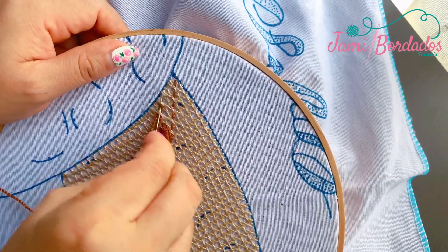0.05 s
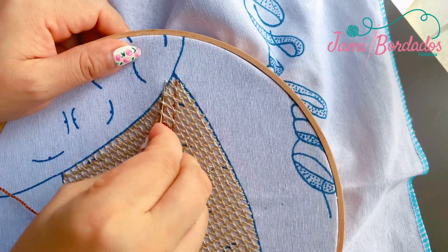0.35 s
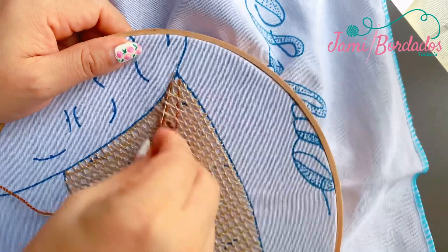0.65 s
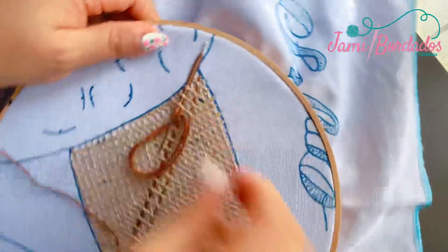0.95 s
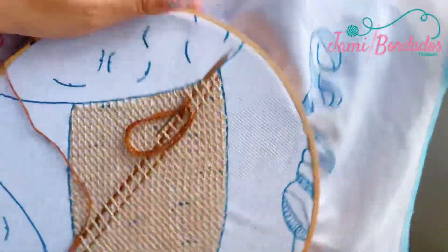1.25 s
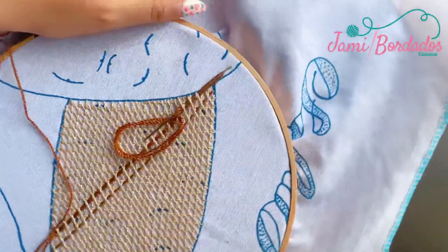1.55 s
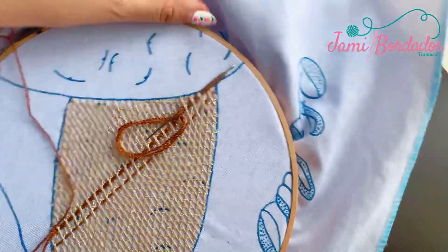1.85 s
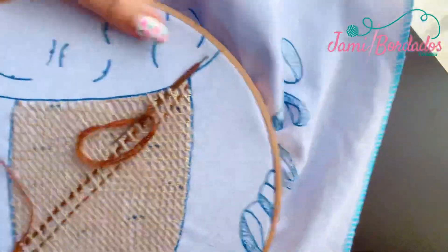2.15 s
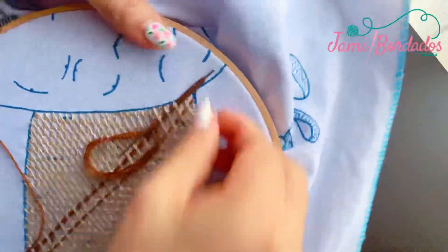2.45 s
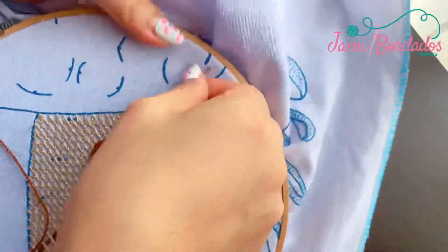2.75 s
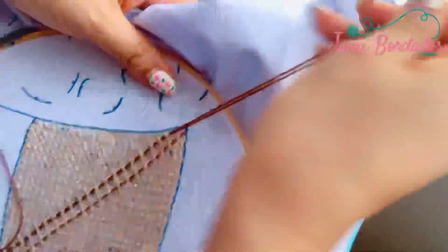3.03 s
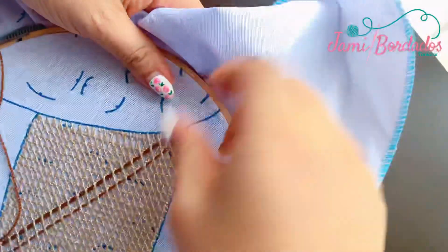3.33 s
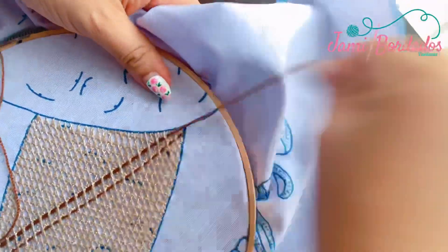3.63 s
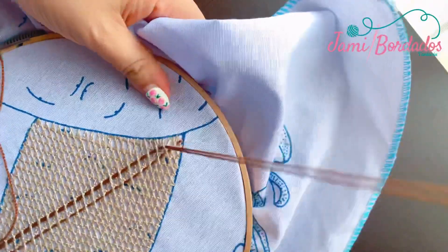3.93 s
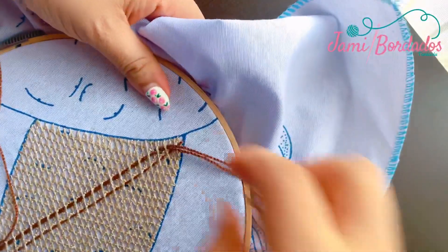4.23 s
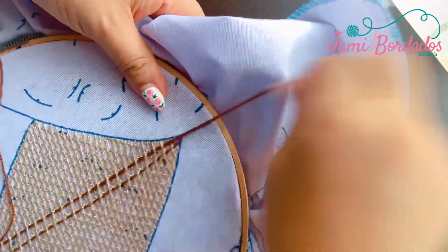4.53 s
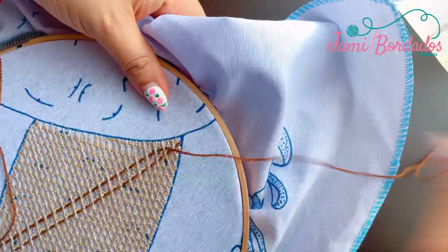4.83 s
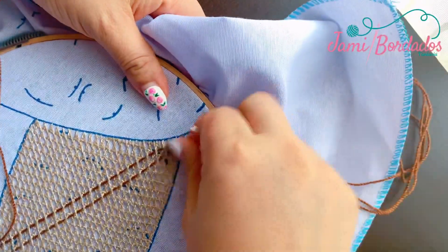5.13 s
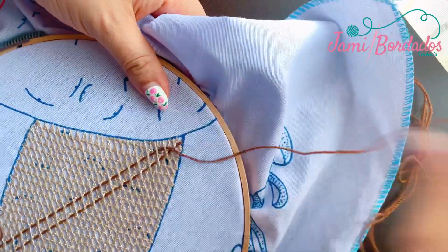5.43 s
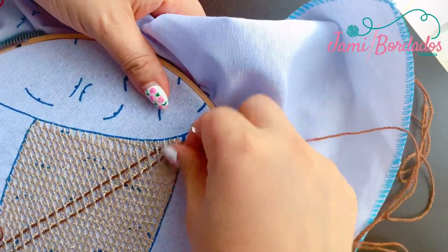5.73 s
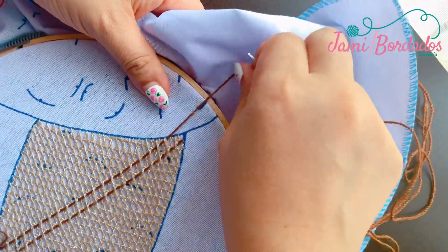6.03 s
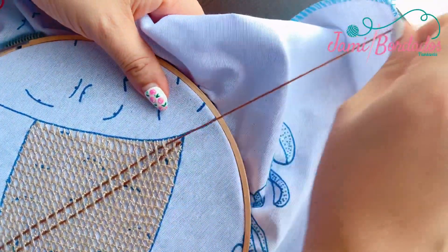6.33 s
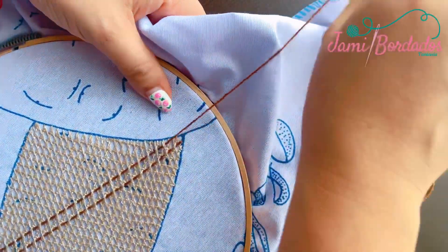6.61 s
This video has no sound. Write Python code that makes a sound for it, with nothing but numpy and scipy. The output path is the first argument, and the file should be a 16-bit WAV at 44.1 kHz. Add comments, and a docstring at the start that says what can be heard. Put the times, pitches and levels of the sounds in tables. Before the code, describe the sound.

Hand embroidery is heard close to the microphone in a quiet room. For the first 2.8 seconds, cotton cloth rustles and rubs as a wooden hoop is shifted, with soft bumps, a sharp tick at about 1.1 seconds and a cluster of small needle and fingernail scrapes around 1.7 to 2.2 seconds. From 2.8 seconds, thread is drawn through the taut fabric in two short, hissing tugs. A longer, rasping pull starts at 3.5 seconds, makes the cloth ring like a slack drum and snaps tight at 3.8 seconds with a dry knock, the loudest sound. Softer pulls follow at about 4.4, 5.1, 5.7 and 6.1 seconds, among light ticks and rustles, until the end near 6.7 seconds. Throughout, a motor drones faintly far outside over low room noise, speeding up and rising in pitch from about 4 seconds.

```python
"""Hand embroidery close to the microphone, in a quiet room with a motor droning faintly far outside.
First, fingers shift a wooden hoop: its cotton cloth rustles, nail and needle scrape and tick on it,
and the hand bumps the frame. From 2.8 s, thread is drawn through the tight cloth in several pulls;
it hisses, rasps and makes the cloth ring like a drum. At 3.8 s it snaps tight with a loud knock.
Softer pulls follow, while the far motor runs faster."""
import sys
import numpy as np
from scipy import signal
from scipy.fft import rfft, irfft, next_fast_len
from scipy.io import wavfile

SR = 44100
rng = np.random.default_rng(int(sys.argv[2]) if len(sys.argv) > 2 else 0)


def waveform_to_disk(signal):
    """Save audio, clipped to [-1, 1], as 16-bit WAV at the path in sys.argv[1]."""
    frames = np.transpose(np.atleast_2d(signal))
    scaled = np.clip(frames, -1, 1) * 32767
    samples = np.round(scaled).astype(np.int16)
    wavfile.write(sys.argv[1], SR, samples)


N = 294147
TIME = np.arange(N) / SR
PADDED = next_fast_len(N + SR // 2, True)  # leaves space for echoes to die away
FREQS = np.maximum(np.fft.rfftfreq(PADDED, 1 / SR), 1)


def from_db(db):
    """Turn decibels into a gain to multiply by."""
    return np.exp(np.asarray(db) * np.log(10) / 20)


def unit_power(x):
    """Scale a sound so that its average power is 1."""
    return x / np.sqrt(np.mean(x ** 2) + 1e-20)


def curve(points):
    """Join (frequency, value) points into a curve over all frequencies."""
    hz, value = np.transpose(points)
    return np.interp(np.log(FREQS), np.log(hz), value)


def shaped(x, response):
    """Filter a sound by giving each frequency its own gain."""
    return irfft(rfft(x, PADDED) * response, PADDED)[..., :N]


def band(x, low_hz, high_hz, order=2):
    """Keep what lies between two frequencies."""
    sos = signal.butter(order, [low_hz, min(high_hz, SR / 2 - 1)], "band", fs=SR, output="sos")
    return signal.sosfilt(sos, x + 1e-18)


def unit_in_band(x, low_hz, high_hz):
    """Scale a sound so that its power between two frequencies is 1."""
    return x / np.std(band(x, low_hz, high_hz))


def drift(rate_hz):
    """A smooth random wander, about 1 in size; a higher rate wanders faster."""
    step, settle = 20, 2000
    pole = np.exp(-2 * np.pi * step * rate_hz / SR)
    noise = rng.standard_normal(N // step + settle + 2)
    slow = signal.lfilter([1], [1, -2 * pole, pole * pole], noise)[settle:]
    return np.interp(np.arange(N) / step, np.arange(len(slow)), unit_power(slow))


def strokes(rows, attack_s, release_s, attack_share=0):
    """Loudness of hand strokes over time: each eases in, swells or fades, then dies away."""
    power = np.zeros(N)
    for start_s, length_s, level_db, swell_db in rows:
        at = int(start_s * SR)
        age = TIME[:min(N - at, int((length_s + 10 * release_s) * SR))]
        rise = np.sin(np.pi / 2 * np.minimum(age / (attack_s + attack_share * length_s), 1)) ** 2
        hold = from_db(level_db + swell_db * (np.minimum(age / length_s, 1) - .5))
        fall = np.exp(-np.maximum(age - length_s, 0) / release_s)
        power[at:at + len(age)] += (rise * hold * fall) ** 2
    return np.sqrt(power)


def room(level_db=-52.5, hum_hz=245.6, hum_db=-65, pan_db=-2.0):
    """The room's air: a dull, steady noise, nearly alike left and right in the bass, and a faint hum."""
    # Tone of the background noise: frequency_hz, level_db
    air_tone = [(20, -31), (42, -2.5), (70, 0), (115, -7), (160, -5.5), (210, -15), (260, -16.5),
                (340, -31), (450, -40.5), (650, -40.5), (880, -42.5), (980, -26), (1100, -47.5),
                (1500, -38), (1700, -40), (1950, -44.5), (2300, -42.5), (2900, -43), (4200, -53),
                (7000, -49), (11000, -51), (16000, -56.5)]
    # Strength of the part that is opposite left and right: frequency_hz, gain_db
    side_tone = [(35, -26), (100, -15), (250, -2.5), (500, 14.5), (4000, 0.5), (16000, -2.5)]
    middle, side = unit_power(shaped(rng.standard_normal((2, N)), from_db(curve(air_tone))))
    middle = middle * from_db([[pan_db / 2], [-pan_db / 2]])
    side = shaped(side, from_db(curve(side_tone))) * np.array([[1], [-1]])
    hum = from_db(hum_db) * unit_power(np.sin(2 * np.pi * hum_hz * TIME))
    return hum + from_db(level_db) * (middle + side)


def motor(waver_db=1.97, jitter=0.0029, top_roar_db=-66.5, roar_db_per_octave=28, pan_db=-2.0):
    """A far motor slows, then speeds up; only its lowest tones and a dull roar pass the walls."""
    # How the motor runs: time_s, firing_rate_hz, drone_db
    run = [(0, 54.4, -67), (.5, 54.27, -51), (1.0, 54.25, -46.5), (1.5, 52.45, -46), (2.0, 53.1, -50),
           (2.8, 50.43, -44), (3.3, 47.9, -56.5), (3.7, 52.07, -56), (3.95, 71, -47), (4.15, 73.2, -42),
           (4.35, 74.1, -49.5), (4.75, 78.76, -43.5), (5.1, 81.55, -43.5), (5.4, 82.74, -45.5),
           (5.75, 82.35, -47.5), (6.17, 80.66, -39), (6.67, 78.75, -51.5)]
    # Tones in its drone: multiple_of_firing_rate, level_db
    tones = [(1, 1), (1.5, -14.5), (2, -10.5), (2.5, -14), (3, -21.5), (3.5, -21)]
    # Tone of its roar: frequency_hz, level_db
    roar_tone = [(80, -20.5), (200, -4.5), (300, -1.5), (350, 2), (420, -15), (540, -18.5), (650, -10.5),
                 (780, -16.5), (1200, -22), (1650, -14.5), (2500, -27), (5000, -44.5)]
    time_s, *columns = np.transpose(run)
    firing_hz, drone_db = [np.interp(TIME, time_s, column) for column in columns]
    phase = 2 * np.pi * np.cumsum(firing_hz * (1 + jitter * drift(9.6))) / SR
    drone = sum(from_db(db + waver_db * drift(2.9)) * np.sin(multiple * phase + 2 * np.pi * rng.random())
                for multiple, db in tones)
    roar = unit_power(shaped(rng.standard_normal(N), from_db(curve(roar_tone))))
    roar *= from_db(top_roar_db + roar_db_per_octave * np.log2(firing_hz / firing_hz.max()))
    return (from_db(drone_db) * unit_power(drone) + roar) * from_db([[pan_db / 2], [-pan_db / 2]])


def slips(per_s, spread_db, clump_db, clump_hz):
    """Fibres catch and let go: random clicks of uneven size, in louder and softer clumps."""
    chance, size, sign = rng.random((3, N))
    clicks, at = np.zeros(N), chance < per_s / SR
    clicks[at] = from_db(spread_db * np.minimum(-np.log(1 - size[at]), 4)) * np.sign(sign[at] - .5)
    return clicks * from_db(clump_db * drift(clump_hz))


def spread_out(x):
    """Rubbing covers a patch of cloth, so left and right each hear some noise of their own."""
    # What one side hears alone, compared with what both share: frequency_hz, level_db
    one_side = [(300, -12), (700, -5), (1500, -12), (2500, -1), (4000, -2), (5200, -11), (16000, -9)]
    own = from_db(curve(one_side))
    shared = 1 / np.sqrt(1 + own ** 2)
    return shaped(unit_power(x), shared) + shaped(rng.standard_normal((2, N)), own * shared)


def hoop(force):
    """The cloth stretched in its hoop rings like a slack drum when it is pushed."""
    # Its ringing tones: pitch_hz, level_db, ring_s (time to fade by 60 dB)
    tones = [(90, -7, 0.26), (122.4, 1.5, 0.086), (174, 0, 0.1), (215, -7, .1), (271, 6.5, .24),
             (339, -5, 0.19), (399, -12.5, 0.06), (445, -12, .14), (640, -9, .1), (790, -8.5, 0.1),
             (859.8, -13.5, .1), (960, -2.5, 0.1), (1045, -7, 0.09), (1195, -15.5, 0.11), (1545, -11, .08),
             (1970, -9, 0.07), (2067, -13, .08), (2309, -2.5, 0.08)]
    age = TIME[:SR // 4]
    ring = sum(from_db(db - 60 * age / ring_s) * np.cos(2 * np.pi * hz * age)
               for hz, db, ring_s in tones)
    return signal.oaconvolve(force, ring / np.linalg.norm(ring))[:N]


def cloth(attack_s=0.027, release_s=0.017, flutter_db=0.98, grip_db=1.53, ring_db=-25.0):
    """Folds swish over each other; fingertips rub the stretched weave and make it ring."""
    # The hand shifts the cloth; long moves are light, steady contact under the short ones:
    # start_s, length_s, swish_db, rub_db, swell_db (change from start to end)
    moves = [ (0.14, 0.057, -97, -63, 5), (0.181, 0.077, -64.5, -67, 4), (0.443, 0.33, -74, -67, -17),
             (0.756, 2, -64.5, -64, 2), (1.201, 0.4, -83, -67, 8), (3.105, 0.19, -64.5, -70.5, -1),
             (0.399, 0.087, -59.5, -61.5, 8), (0.545, 0.083, -67, -70, 10), (0.683, 0.072, -51.5, -56, 10),
             (0.754, 0.33, -52, -64.5, 1.5), (0.866, 0.5, -56.5, -62.5, 12), (1.119, 0.072, -75, -74, -6),
             (1.378, 0.13, -64, -83, -10), (1.655, 0.16, -52.5, -54.5, 6.5), (1.828, 0.083, -56.5, -53, -9),
             (2.009, 0.12, -51.5, -58, 3), (2.113, 0.093, -55.5, -68, 11.5), (2.276, 0.019, -53, -64, 7),
             (2.417, 0.15, -61.5, -74, -10), (2.544, 0.038, -60, -58, 4), (2.702, 0.064, -60, -55, 11),
             (2.749, 0.085, -49.5, -56, 14.5), (2.875, 0.19, -58, -58.5, -15),
             (3.127, 0.038, -59.5, -84, 9), (3.342, 0.059, -56, -57, 1.5),
             (3.417, 0.046, -55.5, -57.5, 2.5), (3.924, 0.088, -66.5, -70, -16),
             (4.277, 0.2, -60, -68.5, -5), (4.983, 0.13, -65, -66, 0), (5.541, 0.38, -65, -69, -3),
             (5.886, 0.2, -59, -58.5, 5), (6.294, 0.093, -67, -61.5, -3), (6.383, 0.27, -72.5, -67, 10), ]
    # Tone of the swish: frequency_hz, level_db
    swish_tone = [(200, -1.5), (370, -1.5), (550, -30), (750, -24), (960, -11), (1230, -9.5), (1600, -0.5),
                  (2600, -6.5), (4000, -1.5), (6300, 4), (8500, 1), (12000, -7), (16000, -6)]
    # Tone of the rubbing: frequency_hz, level_db
    rub_tone = [(120, -2.5), (330, -3), (520, -8), (780, -2.5), (950, 0.5), (1230, -4.5), (1600, 0.5),
                (2100, -4), (2700, -9), (6000, -21)]
    start_s, length_s, swish_db, rub_db, swell_db = np.transpose(moves)
    flutter = from_db(flutter_db * drift(7.6))
    swish_gain = strokes(zip(start_s, length_s, swish_db, swell_db), attack_s, release_s)
    rub_gain = strokes(zip(start_s, length_s, rub_db, swell_db), attack_s, release_s)
    fibres = spread_out(slips(per_s=7000, spread_db=-3.5, clump_db=2.0, clump_hz=18))
    fingers = slips(per_s=2000, spread_db=0.0, clump_db=1.5, clump_hz=93)
    swish = swish_gain * unit_in_band(shaped(fibres, from_db(curve(swish_tone))), 6000, 11000)
    rub = rub_gain * unit_in_band(shaped(fingers, from_db(curve(rub_tone))), 550, 3800)
    rub *= from_db(grip_db * drift(3.6))
    return flutter * (swish + rub + from_db(ring_db) * hoop(rub))


def scrapes(width_octaves=1.07, attack_s=0.0067, release_s=0.0063, ring_db=-7.0):
    """Nail, needle or thread skips across the weave in short bursts of tiny clicks."""
    # One scrape per row: start_s, length_s, level_db, pitch_hz
    bursts = [(0.15, 0.02, -66, 815), (0.42, 0.052, -57.5, 1780), (0.567, 0.016, -58.5, 796),
              (1.141, 0.038, -58.5, 685), (1.66, 0.037, -60, 1400), (1.692, 0.032, -47, 1190),
              (1.725, 0.02, -48.5, 1438), (1.772, 0.039, -49.5, 1320), (1.852, 0.02, -55, 805),
              (1.894, 0.017, -58, 1140), (2.057, 0.013, -52, 1210), (2.093, 0.021, -48.5, 1030),
              (2.181, 0.021, -53, 1140), (2.575, 0.023, -57, 1302), (2.626, 0.047, -57.5, 1540),
              (2.725, 0.046, -52.5, 580), (2.862, 0.015, -47, 830), (2.9, 0.065, -57.5, 498),
              (3.499, 0.031, -48.5, 1613), (3.563, 0.027, -43, 513), (3.845, 0.055, -43.5, 2180),
              (5.791, 0.025, -53, 1550), (5.901, 0.018, -54.5, 998), (6.126, 0.024, -60, 1170),
              (6.308, 0.03, -52, 1940)]
    grains = slips(per_s=900, spread_db=1.5, clump_db=0.5, clump_hz=120)
    spread = 2 ** (width_octaves / 2)
    out = np.zeros(N)
    for start_s, length_s, level_db, hz in bursts:
        gain = strokes([(start_s, length_s, level_db, 0)], attack_s, release_s)
        out += gain * unit_power(band(grains, hz / spread, hz * spread, order=3))
    return out + from_db(ring_db) * hoop(out)


def ticks(lag_s=0.00018, width_octaves=1.38, scuff_s=0.004, scuff_db=-21.5, scratch_s=0.0022):
    """Nail, needle and thread snag on the cloth: each tug is a dry, woody knock with a bright scratch."""
    # One snag per row, with levels before the final mix: time_s, knock_db, scratch_db, pitch_hz
    snags = [(0.164, -43.5, -74, 1300), (0.255, -45, -43, 1600), (0.439, -43, -34, 1400),
             (0.58, -47, -70, 900), (1.129, -17.5, -31, 1300), (1.768, -28.5, -39, 1370),
             (1.8432, -30.5, -32.5, 1050), (1.8462, -31, -48, 1070), (2.071, -30.5, -41, 1220),
             (2.099, -38, -44, 1400), (2.206, -41.5, -34.5, 1000), (2.593, -53, -62, 1280),
             (2.632, -41.5, -65, 1280), (2.724, -37, -60, 1109), (2.755, -31, -49, 1350),
             (2.866, -35, -54, 950), (3.047, -34, -48, 1280), (3.059, -27.5, -44, 1290),
             (3.235, -54, -44, 1280), (3.355, -41, -55, 1230), (3.506, -42, -48.5, 1600),
             (3.658, -23, -49, 950), (3.675, -29.5, -52, 990), (3.703, -23.5, -45, 900),
             (3.745, -29, -49.5, 1000), (3.794, -27.5, -41, 1400), (3.817, -23, -46.5, 850),
             (3.83, -6, -36, 1350), (3.8321, -15.5, -43.5, 1300), (3.8475, -15.5, -43.5, 700),
             (4.293, -42, -44, 1290), (4.324, -49, -37, 1280), (4.985, -37, -43.5, 1380),
             (5.02, -39, -44, 1280), (5.561, -38.5, -42, 1501), (6.32, -52, -51, 1275),
             (6.491, -44, -52, 1300)]
    tugs, knocks, scratches = np.zeros((3, N))
    age, spread = TIME[:SR // 20], 2 ** (width_octaves / 2)
    for time_s, knock_db, scratch_db, hz in snags:
        at = round((time_s + lag_s) * SR)
        scuff, grit = rng.standard_normal((2, len(age)))
        force = (age == 0) + from_db(scuff_db) * scuff * np.exp(-age / scuff_s)  # tug, then scuffing
        tugs[at] += from_db(knock_db)
        knocks[at:at + len(age)] += from_db(knock_db) * band(force, hz / spread, hz * spread, order=4)
        scratches[at:at + len(age)] += from_db(scratch_db) * grit * np.exp(-age / scratch_s)
    muffle = signal.butter(8, 2410, fs=SR, output="sos")  # tight cloth passes little of a knock's treble
    wood = from_db(-4.5) * band(tugs, 850, 1080, order=1)
    knock = signal.sosfilt(muffle, knocks + 1e-18) + wood
    scratch = band(scratches, 2400, 15260)
    return from_db(21.5) * knock + from_db(10.0) * hoop(knock) + from_db(-1.5) * scratch


def bumps(fade_cycles=0.81):
    """The soft hand pushes the hoop, which swings back and forth once or twice."""
    # One push per row: time_s, level_db, pitch_hz
    pushes = [(0.571, -39.5, 200), (0.856, -23, 84), (1.13, -37, 272), (1.843, -31, 150), (1.953, -30, 110),
              (2.17, -33, 55), (2.209, -34, 338.3), (3.063, -23, 138), (3.092, -22, 119), (3.701, -21, 234),
              (3.811, -19, 105.2), (3.831, -22, 240), (3.849, -17, 270), (3.861, -19.5, 281),
              (3.878, -22, 160), (4.495, -28.5, 125.6), (4.514, -28, 120)]
    out, age = np.zeros(N), TIME[:SR // 6]
    for time_s, level_db, hz in pushes:
        at, cycles = round(time_s * SR), age * hz
        gain = from_db(level_db) * np.tanh(4 * cycles) * np.exp(-cycles / fade_cycles)
        out[at:at + len(age)] += gain * np.sin(2 * np.pi * cycles)
    return out


def gliding_resonance(force, hz, width_hz):
    """Make a sound ring around one pitch that slides over time."""
    turn = np.exp(2j * np.pi * np.cumsum(hz) / SR)
    pole = np.exp(-np.pi * width_hz / SR)
    return np.real(turn * signal.lfilter([1], [1, -2 * pole, pole * pole], force / turn))


def thread(attack_s=0.039, release_s=0.012, rasp_db_per_s=13, slack_share=0.55):
    """Twisted thread saws through the weave: it hisses, rasps higher with speed and shakes the hoop."""
    # One pull per row: start_s, length_s, hiss_db, rasp_db, drum_db, swell_db (from start to end),
    # tighten_db (extra swell of the drumming), top_hz (pitch of the rasp at top speed)
    pulls = [ (2.806, 0.071, -42, -44, -40, -7, -7, 800), (3.027, 0.069, -39.5, -40, -48, -2, 9, 788),
             (3.469, 0.43, -39.5, -43, -39, 1, 18, 1017), (4.303, 0.029, -44.5, -56, -62, 0.5, -2, 656),
             (4.395, 0.27, -42, -45.5, -56.5, -3.5, 14, 659.5), (4.993, 0.034, -48, -51.5, -78, 4, 1, 657),
             (5.086, 0.2, -43, -45, -56, 0, 6, 673), (5.578, 0.052, -47.5, -54, -59, -7.5, -1, 650),
             (5.721, 0.18, -49.5, -69, -57, -1, 6, 600), (6.052, 0.27, -48.5, -58, -60, -9, 9, 552), ]
    # The hand speeds up, then brakes at the end of its reach: share_of_pull, share_of_top_speed
    hand_speed = [(0, .3), (.27, .57), (.5, .87), (.79, 1), (.92, .78), (1.02, .47), (1.15, .3)]
    start_s, length_s, hiss_db, rasp_db, drum_db, swell_db, tighten_db, top_hz = np.transpose(pulls)

    def pull_gain(level_db, growth_db, attack_share):
        """Loudness of one layer; in a longer pull the hand takes longer to gather speed."""
        return strokes(zip(start_s, length_s, level_db, growth_db), attack_s, release_s, attack_share)

    hiss_gain = pull_gain(hiss_db, swell_db, attack_share=0.16)
    # Rasp and drumming come in more slowly, as the slack is taken up.
    rasp_gain = pull_gain(rasp_db, swell_db + rasp_db_per_s * length_s, slack_share)
    drum_gain = pull_gain(drum_db, swell_db + tighten_db, slack_share)
    pull = np.maximum(np.searchsorted(start_s, TIME) - 1, 0)  # the latest pull at each moment
    speed = np.interp((TIME - start_s[pull]) / length_s[pull], *np.transpose(hand_speed))
    fibres = spread_out(slips(per_s=7000, spread_db=1.0, clump_db=1.1, clump_hz=110))
    twists = unit_power(slips(per_s=1400, spread_db=3.5, clump_db=-0.1, clump_hz=78))
    snags = unit_power(slips(per_s=700, spread_db=3.0, clump_db=-1.0, clump_hz=60))
    # Tone of the hiss heard during each pull: frequency_hz, level_db
    hiss_tone = [(200, 5), (370, 1.5), (470, 0), (580, 2.5), (780, -6), (1000, 6.5), (1150, 2.5), (1400, 1),
                 (1570, 2), (1780, 2.5), (2300, 1.5), (2700, -1.5), (4000, -0.5), (5200, -7), (6100, 3),
                 (6700, 1), (9000, -1.5), (12000, -5), (16000, -5.5)]
    hiss = hiss_gain * unit_in_band(shaped(fibres, from_db(curve(hiss_tone))), 6160, 13000)
    rasp = rasp_gain * speed * unit_power(gliding_resonance(twists, top_hz[pull] * speed, width_hz=240))
    return hiss + rasp + hoop(drum_gain * snags)


def echoes(fade_s):
    """A left and right filter for a wash of reflections that falls by 60 dB in fade_s."""
    age = TIME[:SR // 2]
    tails = rng.standard_normal((2, len(age))) * np.exp(-np.log(1000) * age / fade_s)
    return rfft(tails / np.linalg.norm(tails, axis=1, keepdims=True), PADDED)


def microphone(x, near_echo_db=-29.5, room_echo_db=-25):
    """Close sound reaches left and right unequally, and bounces off hands, table and room."""
    # How much sooner the left side hears it: frequency_hz, lead_ms
    left_lead = [(100, .1), (700, .08), (1500, .03), (2500, .065), (4000, .072), (5100, .098), (8500, .117),
                 (12400, .121), (16000, .124)]
    # How the two sides compare in level: frequency_hz, left_minus_right_db
    balance = [(60, -1), (200, -6.5), (450, -5.5), (750, -4.5), (1100, 0), (2300, -4), (4500, 0),
               (8000, 0.5), (16000, -1)]
    left = from_db(curve(balance) / 2) * np.exp(1j * np.pi * FREQS * curve(left_lead) / 1000)
    direct = np.array([left, 1 / left])  # each side takes half of the level gap and time gap
    near_echo = from_db(near_echo_db) * echoes(fade_s=0.21)
    room_echo = from_db(room_echo_db) * echoes(fade_s=0.5)
    return shaped(x, direct + near_echo + room_echo)


def scene():
    """Needlework in front, motor and room behind."""
    needlework = cloth() + thread() + bumps() + scrapes() + ticks()
    return microphone(needlework) + motor() + room()


def record(dry):
    """Cut off the very highest treble steeply."""
    cutoff_hz = 15900
    return shaped(dry, 1 / np.sqrt(1 + (FREQS / cutoff_hz) ** 300))


dry = scene()
out = record(dry)
waveform_to_disk(out)
```